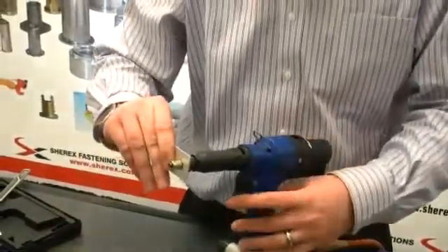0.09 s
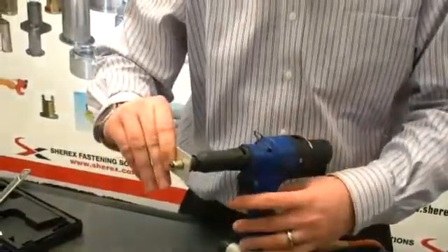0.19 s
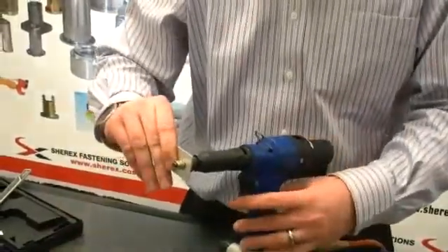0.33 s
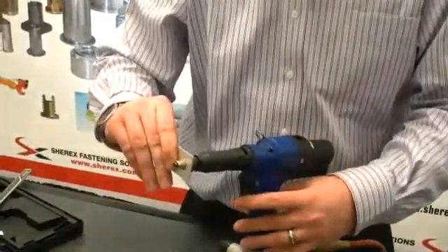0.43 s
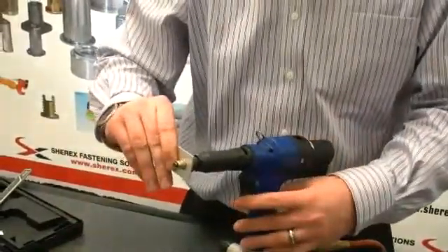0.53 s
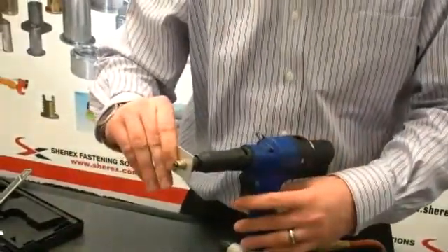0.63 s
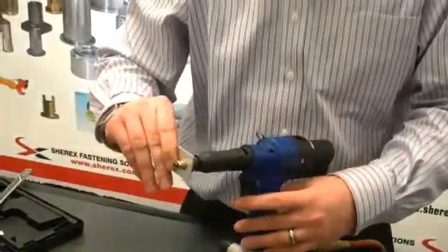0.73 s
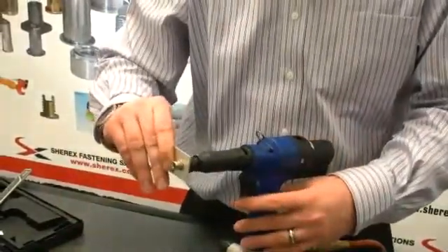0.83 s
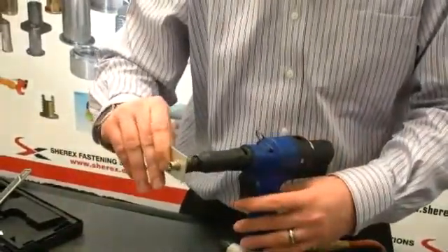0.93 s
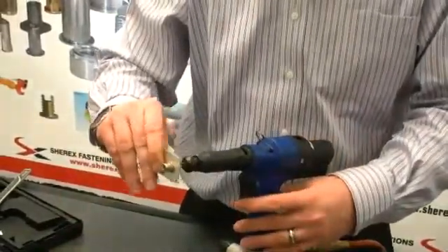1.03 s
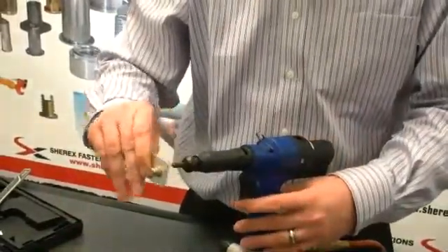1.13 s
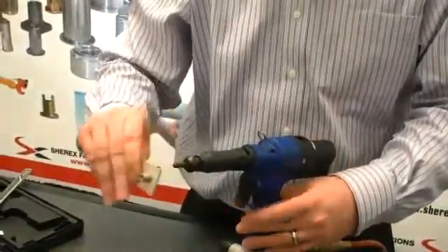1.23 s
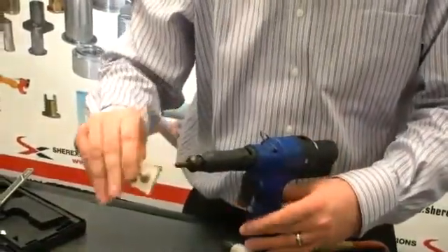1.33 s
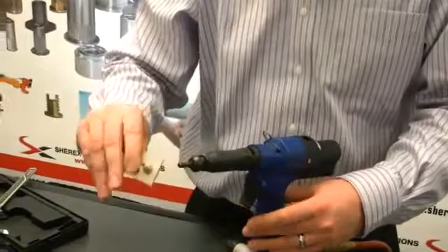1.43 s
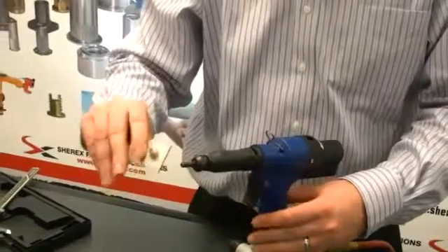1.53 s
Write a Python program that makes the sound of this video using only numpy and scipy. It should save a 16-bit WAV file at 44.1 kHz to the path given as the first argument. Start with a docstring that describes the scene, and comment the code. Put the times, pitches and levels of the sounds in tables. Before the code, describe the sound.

Close stereo pickup of an air-powered rivet nut tool in a small, lightly echoing workshop: sharp valve click, two stages of hissing air, a strong knock, half a second of wavering motor whine, abrupt stop, faint bleed and click.

```python
"""A pneumatic rivet nut tool sets a fastener in a small plate, close by in a humming workshop.
The grip rustles, then the trigger valve knocks and squeaks, the air hose rumbles, and shaped noise leaks
as air during the pull. A second valve opens the exhaust; then the vane motor spins up, a stack of wavering
sine partials over puffing noise, to unscrew the mandrel. It shuts off with a spit of air, the last air
bleeds away and the room, made from fading noise echoes, rings on."""
import sys
import numpy as np
from scipy import signal
from scipy.fft import rfft, irfft
from scipy.io import wavfile

SR = 44100
rng = np.random.default_rng(int(sys.argv[2]) if len(sys.argv) > 2 else 0)


def wrap_up_sound(samples):
    """Save the sound to the file named by the first command line argument, as 16-bit audio."""
    columns = np.atleast_2d(samples).T
    # keep every value between -1 and 1, then stretch to whole-number steps
    tamed = np.clip(columns, -1, 1)
    steps = np.round(tamed * 32767).astype(np.int16)
    wavfile.write(sys.argv[1], SR, steps)


N = 70560  # samples, 1.6 s
TOP_HZ = 10280  # the treble ends here

# Colours are relative: noise() evens out their overall level. Side levels are relative to the middle.
# Workshop background colour. Each row: frequency in Hz, level in dB.
SHOP_COLOUR = [(25, -28.5), (60, -12.5), (120, 1), (200, 5.5), (340, -9.5), (480, -4.5), (600, -16),
               (1500, -21.5), (4000, -26.5), (10500, -30)]
# Left-right difference of the background. Each row: frequency in Hz, side level in dB.
SHOP_SIDE = [(60, -13), (120, -16), (340, -6.5), (600, -1), (1100, 4.5), (10000, -3.5)]
# Mains hum. Each row: frequency in Hz, rms level in dB.
HUM_TONES = [(119, -57), (212, -62), (240, -67)]
# Left-right difference of rushing air. Each row: frequency in Hz, side level in dB.
AIR_SIDE = [(60, -36.5), (300, -20.5), (1000, -18.5), (3000, -22), (6000, -14), (9500, -9.5)]

# Faint rustle of the grip before the trigger. Each row: time in seconds, level in dB.
RUSTLE_LEVEL = [(.06, -78), (.115, -55), (.17, -66.5), (.22, -56)]
# Its colour. Each row: frequency in Hz, level in dB.
RUSTLE_COLOUR = [(80, -4), (400, 3), (900, -1.5), (2200, -6.5), (4000, -20), (10000, -39)]
# Low rumble of the air hose after the first knock. Each row: time in seconds, level in dB.
RUMBLE_LEVEL = [(.225, -62.5), (.245, -35), (.29, -38.5), (.345, -44.5), (.38, -65.5)]
# Its colour. Each row: frequency in Hz, level in dB.
RUMBLE_COLOUR = [(25, -25), (60, -7.5), (110, -14), (180, 2.5), (300, -14), (700, -42)]
# Light clicks of handled metal. Each row: start in seconds, level in dB.
CLICKS = [(.266, -37.5), (0.273, -36.5), (1.529, -37)]
# Their colour. Each row: frequency in Hz, level in dB.
CLICK_COLOUR = [(80, -5), (250, 19), (700, -1.5), (1300, 9), (2200, -2.5), (3300, 8), (6000, -13),
                (11000, -7)]

# Colour of the first echoes. Each row: frequency in Hz, level in dB.
EARLY_COLOUR = [(60, -2), (200, -7.5), (800, 3.5), (2400, 1), (5000, 4), (10500, -10.5)]
# Colour of the long tail. Each row: frequency in Hz, level in dB.
TAIL_COLOUR = [(60, -23), (200, -20), (500, 5.5), (800, 7.5), (1600, -3), (2400, -3.5), (4000, -8.5),
               (7000, -22.5), (10500, -26.5)]

# Air leaking during the pull. Each row: time in seconds, level in dB.
LEAK_FLOW = [(.229, -32), (.233, -34.5), (.275, -31.5), (.305, -31), (.345, -26.5), (.375, -27.5),
             (.41, -29), (.468, -30.5), (.49, -60)]
# Its colour. Each row: frequency in Hz, level in dB.
LEAK_COLOUR = [(60, -15), (400, -16), (1000, -15.5), (1750, -18), (2300, -8), (3000, -6), (3450, -3.5),
               (4200, -2.5), (4650, -8), (5150, 0), (5500, -6.5), (6100, 2), (6900, -3.5), (7750, -3.5),
               (8200, -6), (10200, -6)]
# Exhaust during the stroke. Each row: time in seconds, level in dB.
EXHAUST_FLOW = [(.468, -60), (.474, -20), (.50, -22.5), (.525, -18.5), (.58, -20.5), (.66, -21.5),
                (.80, -21.5), (.835, -29.5), (.86, -47)]
# Its colour. Each row: frequency in Hz, level in dB.
EXHAUST_COLOUR = [(60, -20.5), (200, -12.5), (550, -23), (780, -13), (980, 1), (1150, -0.5), (1400, -10.5),
                  (1800, -4), (2300, -0.5), (2720, 4.5), (2860, 7.5), (2960, 4.5), (3120, -6), (3500, 3.5),
                  (3800, 2), (4300, -5.5), (5000, -4.5), (5700, 1), (6450, 6.5), (6950, -3), (7600, 5),
                  (7950, -7), (8300, 9), (8750, -0.5), (9280, 8.5), (9440, 5), (9650, 9.5), (10200, -6.5)]
# Air bleeding off after the stop, until the valve seats. Each row: time in seconds, level in dB.
BLEED_FLOW = [(1.3, -51), (1.33, -42), (1.42, -45.5), (1.525, -50), (1.545, -76.5)]
# Its colour. Each row: frequency in Hz, level in dB.
BLEED_COLOUR = [(60, -24), (200, 7.5), (600, 0.5), (1200, -10), (3000, -2.5), (5000, -4), (7300, -1.5),
                (8000, -2.5), (8700, -1), (10300, -3.5)]
# Its left-right difference. Each row: frequency in Hz, side level in dB.
BLEED_SIDE = [(200, -23.5), (1000, -15), (2000, -1), (10000, -8)]

# Valve knocks. Each row: start in seconds, thump in dB, pitch factor of the ring, clack in dB, tick in dB.
KNOCKS = [(0.2314, -17, 0.93, -26.5, -19), (0.2385, -20.5, 0.99, -36.5, -43.5), (0.246, -24, 1.0, -44, -37),
          (0.443, -26, 0.76, -54, -64), (0.4711, -20.5, 0.99, -18, -21), (.8078, -9.5, 1.25, -16.5, -11),
          (0.8141, -13.5, 1.7, -16.5, -26), (0.821, -24.5, 3, -10, -26), (1.296, -19.5, 1.05, -23.5, -34),
          (1.3043, -34, 0.85, -28, -26.5)]
# Ringing modes of the housing. Each row: frequency in Hz before the pitch factor, level in dB before
# the thump level is added, time to fade by 60 dB in seconds.
HOUSING_MODES = [(170.7, -9.5, .08), (235.3, 2, 0.045), (310, -14.5, 0.027), (607, -22, 0.13),
                 (1188, -25, 0.28)]
# Colour of a dull clack. Each row: frequency in Hz, level in dB.
CLACK_COLOUR = [(40, -31), (150, -2.5), (450, -0.5), (950, 1), (1350, -0.5), (1800, -9), (2500, -6.5),
                (4500, -24.5), (11000, -30)]
# Colour of a bright tick. Each row: frequency in Hz, level in dB.
TICK_COLOUR = [(1500, -10), (3500, -7.5), (7000, 3), (10500, -4)]
# Whistle of the valve seat. Each row: time in seconds, level in dB before its flutter.
WHISTLE_FLOW = [(.237, -82), (.240, -32), (.2455, -18), (.252, -28), (.275, -40), (.33, -33), (.45, -34.5),
                (.48, -65.5), (.56, -38), (.8, -35.5), (.83, -70)]
# Low ring of the tool body. A single row: frequency in Hz, level in dB, decay in seconds.
BODY_RING = (183, -30, 0.043)

# How often the motor vanes pass. Each row: time in seconds, rate in Hz before the wavering.
MOTOR_SPEED = [(.815, 609.5), (.835, 730.5), (.858, 741), (.872, 765), (.89, 772.5), (.91, 789.5),
               (1.0, 789.5), (1.17, 790), (1.29, 786), (1.32, 772)]
# Strength of the whine. Each row: time in seconds, level in dB.
MOTOR_DRIVE = [(.818, -46), (.828, -18), (.838, -11.5), (.86, -13.5), (.885, -15.5), (.915, -14),
               (.97, -15), (1.19, -14.5), (1.25, -16), (1.298, -17.5), (1.312, -34.5), (1.34, -41)]
# Partials of the whine. Each row: multiple of the vane rate, level in dB at full speed, change in dB while
# slow, left minus right in dB, left lead over right in radians, dB lost as a turn swings the speed up.
WHINE = [(1, -7, -0.5, 0.1, -0.19, 0.3), (2, -4.5, -10, -2.5, .1, 2.5), (3, -4.5, 2, -.7, -0.33, 0.94),
         (4, -18, 3.5, -1, 0.39, 0), (5, -12, 4, -2, 0.39, 1), (7, -25.5, -13, -1, -.3, -7),
         (11, -17, -5.5, 2, -0.31, -3), (12, -18, -17.5, -3.5, -.6, -2.5)]
# Air through the running motor. Each row: time in seconds, level in dB.
MOTOR_FLOW = [(.805, -54.5), (.82, -15.5), (.85, -21.5), (.94, -22.5), (1.2, -23), (1.29, -22.5),
              (1.31, -49.5), (1.35, -81)]
# Its colour. Each row: frequency in Hz, level in dB.
MOTOR_AIR_COLOUR = [(50, -23.5), (170, -0.5), (370, -19.5), (600, -11), (1200, -8), (1900, -28.5),
                    (2250, 9.5), (2520, -8.5), (2750, 3.5), (3400, -3), (3800, 7), (4250, -3.5),
                    (4650, -5.5), (5080, -21.5), (5500, 4), (5950, -4), (6350, 5.5), (6750, -6.5),
                    (7700, 0), (8450, 0.5), (9050, -2), (9350, 3.5), (10200, -6.5)]
# Colour of the spit of air at shut-off. Each row: frequency in Hz, level in dB.
SPIT_COLOUR = [(60, -12), (250, -21), (550, 3.5), (1150, 4.5), (2000, 0), (3500, -2), (5500, -2),
               (7500, -0.5), (9300, 1.5), (10500, -5)]


def undb(db):
    """Turn decibels into gain."""
    return 10 ** (np.asarray(db) / 20)


def clock():
    """Time of every sample in seconds."""
    return np.arange(N) / SR


def curve(points):
    """Straight lines through (time, value) points."""
    times, values = np.array(points).T
    return np.interp(clock(), times, values)


def envelope(points):
    """Gain along (time, dB) points, silent outside them."""
    inside = (clock() > points[0][0]) * (clock() < points[-1][0])
    return undb(curve(points)) * inside


def colour_gain(points):
    """Gain at each spectrum frequency, drawn between (Hz, dB) points on a log scale."""
    f = np.maximum(np.fft.rfftfreq(N, 1 / SR), 1)
    hz, db = np.array(points).T
    return undb(np.interp(np.log(f), np.log(hz), db))


def noise(colour, shade=None):
    """Noise of rms 1 with the given colour, then shaded by a second one if given."""
    f = np.fft.rfftfreq(N, 1 / SR)
    spectrum = rfft(rng.standard_normal(N)) * colour_gain(colour) * (f < TOP_HZ + 500)
    rms = irfft(spectrum, N).std()
    if shade is not None:
        spectrum = spectrum * colour_gain(shade)
    return irfft(spectrum, N) / rms


def walk(rate):
    """Smooth random curve of spread 1 that changes about rate times a second."""
    f = np.fft.rfftfreq(N, 1 / SR)
    y = irfft(rfft(rng.standard_normal(N)) * np.exp(-(f / rate) ** 2), N)
    return y / y.std()


def swing(hz):
    """Phase in radians of a tone whose pitch follows hz."""
    return 2 * np.pi * np.cumsum(hz) / SR


def burst(start, rise, decay):
    """Quick rise and exponential fall, all in seconds."""
    age = np.maximum(clock() - start, 0)
    return np.minimum(age / rise, 1) * np.exp(-np.maximum(age - rise, 0) / decay)


def pan(x, db):
    """Place a sound with left louder than right by db."""
    return x * undb(np.array([[db], [-db]]) / 2)


def jet(colour, side=AIR_SIDE):
    """Turbulent noise: a shared middle plus a side part that is opposite in left and right."""
    middle = noise(colour)
    difference = noise(colour, side) * np.array([[1], [-1]])
    return pan(middle + difference, -0.7)


def workshop():
    """Low ventilation noise, and mains hum as tones whose pitch drifts slightly."""
    hum = 0
    for hz, db in HUM_TONES:
        hum = hum + np.sqrt(2) * undb(db) * np.sin(swing(hz + walk(12)))
    return jet(SHOP_COLOUR, SHOP_SIDE) * undb(-53.5) + hum


def handling():
    """The grip rustles and the hose rumbles; plate and mandrel make short noise clicks."""
    rustle = jet(RUSTLE_COLOUR) * envelope(RUSTLE_LEVEL)
    hose_rumble = jet(RUMBLE_COLOUR) * envelope(RUMBLE_LEVEL)
    strikes = sum(undb(db) * burst(start, 0.00043, 0.0033) for start, db in CLICKS)
    return rustle + hose_rumble + jet(CLICK_COLOUR) * strikes


def echo(start, t60, db, colour):
    """A fading cloud of noise echoes: start and 60 dB fade time in seconds, then level in dB."""
    shape = burst(start, 0.0013, t60 / np.log(1000))
    shape = shape / np.sqrt(2 * np.sum(shape ** 2))
    width = 0.34  # share of left-right difference
    cloud = noise(colour) + width * noise(colour) * np.array([[1], [-1]])
    return undb(db) * shape * cloud


def room(dry):
    """Early reflections from the near walls, then a quiet long tail."""
    response = echo(.003, 0.18, -13.5, EARLY_COLOUR) + echo(.015, 0.61, -22.5, TAIL_COLOUR)
    middle = dry.mean(axis=0)[None]
    return signal.fftconvolve(middle, response, axes=1)[:, :N]


def bench(x):
    """The bench top mirrors the air jets: a late copy gives their hiss a hollow ripple."""
    delay_s, gain = .0034, 0.23
    late = np.pad(x, ((0, 0), (int(delay_s * SR), 0)))[:, :N]
    return (x + gain * late) / np.hypot(1, gain)


def air():
    """Escaping air is turbulent noise: the leak, the exhaust, and the bleed after the stop."""
    leak = jet(LEAK_COLOUR) * envelope(LEAK_FLOW)
    exhaust = jet(EXHAUST_COLOUR) * envelope(EXHAUST_FLOW)
    bleed = jet(BLEED_COLOUR, BLEED_SIDE) * envelope(BLEED_FLOW)
    flutter_db = 0.24 * walk(90)
    return bench(leak + exhaust + bleed) * undb(flutter_db)


def valves():
    """Each valve stroke thumps the housing into ringing, with a dull clack and a bright tick."""
    clack, tick = jet(CLACK_COLOUR), jet(TICK_COLOUR)
    # trims the low push that the abrupt start of each ring makes
    low_cut = signal.butter(1, 110, "high", fs=SR, output="sos")
    out = 0
    for start, thump_db, pitch, clack_db, tick_db in KNOCKS:
        age = np.maximum(clock() - start, 0)
        ring = 0
        for hz, db, t60 in HOUSING_MODES:
            ring = ring + undb(db - 60 * age / t60) * np.sin(-2 * np.pi * hz * pitch * age)
        out = out + undb(thump_db) * signal.sosfilt(low_cut, ring)
        out = out + undb(clack_db) * clack * burst(start, 0.0012, 0.0045)
        out = out + undb(tick_db) * tick * burst(start, 0.00046, 0.0023)
    return out


def whistle():
    """Air squeaks at the valve seat: a high tone unsteady in pitch and level."""
    centre_hz, wander_hz = 6547, 62.6
    tone = np.sqrt(2) * np.sin(swing(centre_hz + wander_hz * walk(120)))
    flutter_db = 2 * walk(120)
    return tone * envelope(WHISTLE_FLOW) * undb(flutter_db)


def body():
    """The tool body rings low after the trigger, as one fading sine."""
    hz, db, decay = BODY_RING
    start = .247  # seconds
    tone = np.sin(2 * np.pi * hz * (clock() - start))
    return undb(db) * burst(start, 0.024, decay) * tone


def motor():
    """Vanes chop the air into a whine that wavers with the turning mandrel; spent air hisses in puffs."""
    speed = curve(MOTOR_SPEED)
    # the load varies with each turn of the mandrel
    turn_hz, wobble, jitter = 28.59, 0.0085, 0.0057  # the last two are shares of the speed
    turn = np.sin(swing(turn_hz * (1 + .08 * walk(14))))
    phase = swing(speed * (1 + wobble * turn + jitter * walk(250)))
    slow = np.clip(765.6 - speed, 0, 1)  # 0 from 765.6 Hz up, 1 from 1 Hz below that down
    roughness = 0.049 + 0.11 * slow
    beat_hz, beat = 60, .09  # rate and size of the uneven beating of each partial
    whine = 0
    for multiple, db, slow_db, pan_db, lead, throb_db in WHINE:
        flutter_db = .7 * walk(26)
        gain = undb(db + slow_db * slow + flutter_db - throb_db * turn)
        # the complex part moves the phase as well as the level
        uneven = 1 + roughness * walk(400) + beat * (walk(beat_hz) + 1j * walk(beat_hz))
        angle = multiple * phase + 1.05 * rng.standard_normal() + lead * np.array([[.5], [-.5]])
        partial = np.sqrt(2) * gain * np.real(uneven * np.exp(1j * angle))
        whine = whine + pan(partial, pan_db)
    pulse = 1 + 0.34 * np.cos(phase)  # the air swells once for each vane
    puffs = jet(MOTOR_AIR_COLOUR) * pulse * undb(0.76 * walk(50))
    return whine * envelope(MOTOR_DRIVE) + bench(puffs * envelope(MOTOR_FLOW))


def spit():
    """A short spit of air at shut-off: noise that jumps up and dies away."""
    return jet(SPIT_COLOUR) * undb(-10.5) * burst(1.2935, 0.00067, 0.0083)


def scene():
    """The tool at work, its room echoes and the workshop around it."""
    tool = handling() + air() + valves() + whistle() + body() + motor() + spit()
    return tool + room(tool) + workshop()


def record(dry):
    """Round the highest peaks towards a ceiling and cut the top steeply."""
    ceiling = .78
    rounded = dry / (1 + (dry / ceiling) ** 8) ** (1 / 8)
    top_cut = signal.ellip(8, .1, 60, TOP_HZ, fs=SR, output="sos")
    return signal.sosfiltfilt(top_cut, rounded)


dry = scene()
out = record(dry)
wrap_up_sound(out)
```